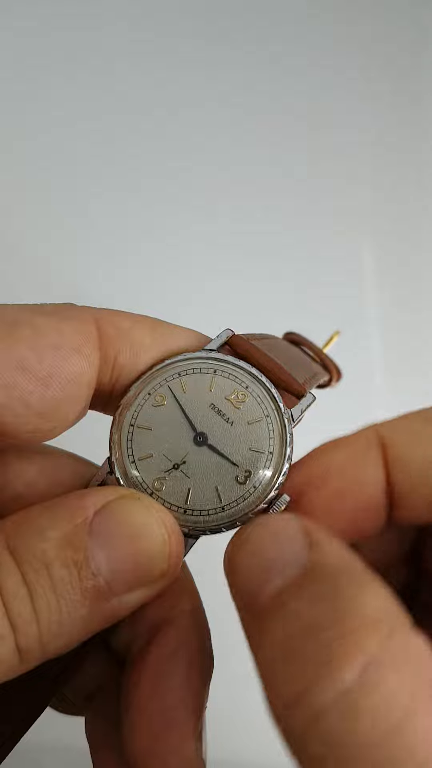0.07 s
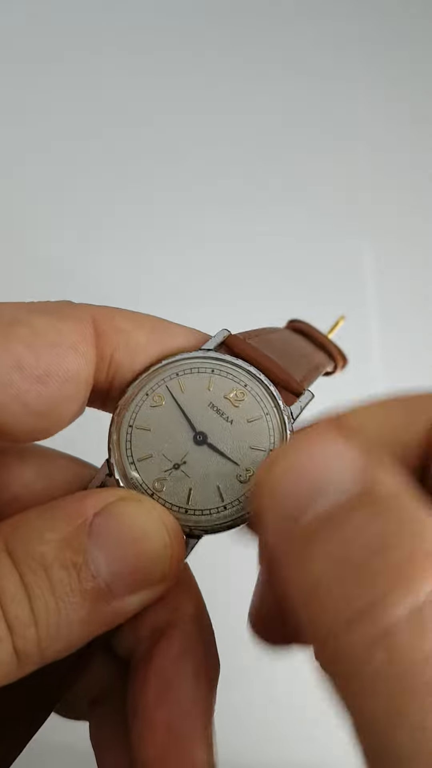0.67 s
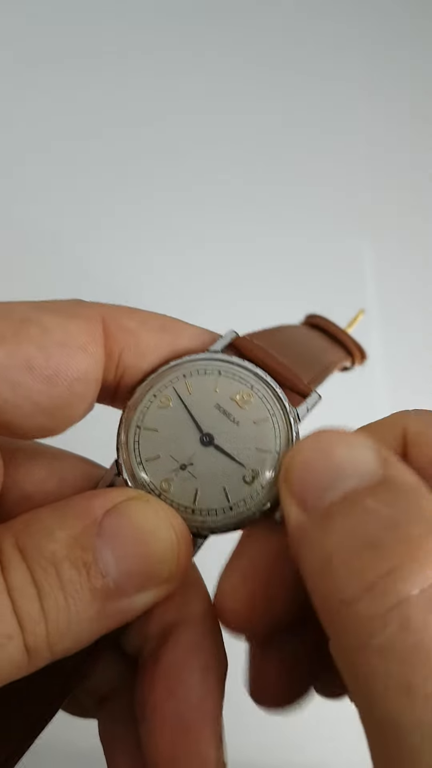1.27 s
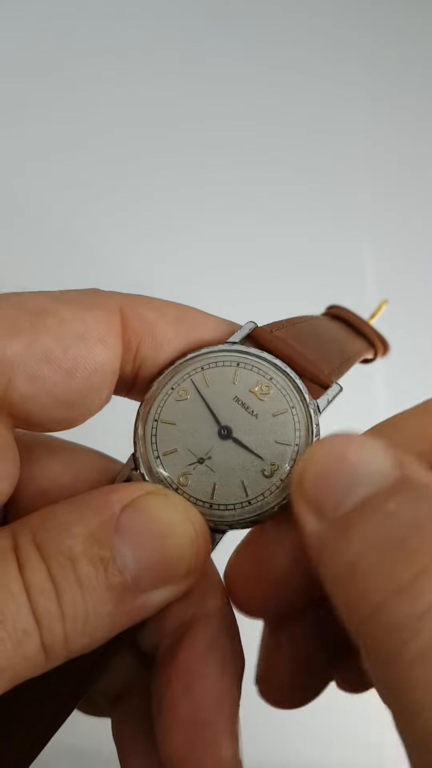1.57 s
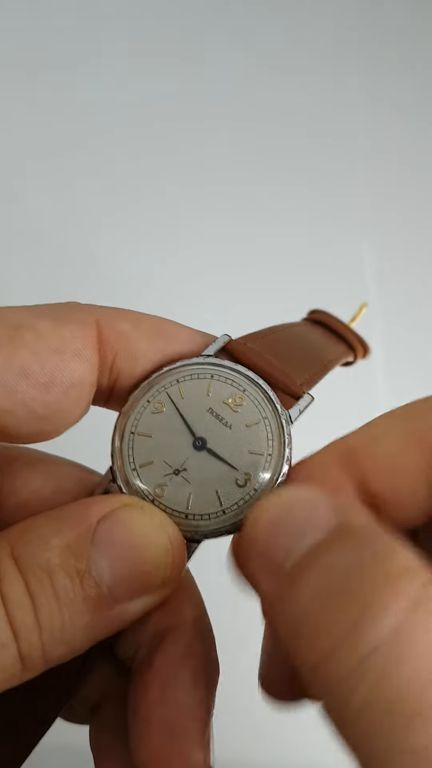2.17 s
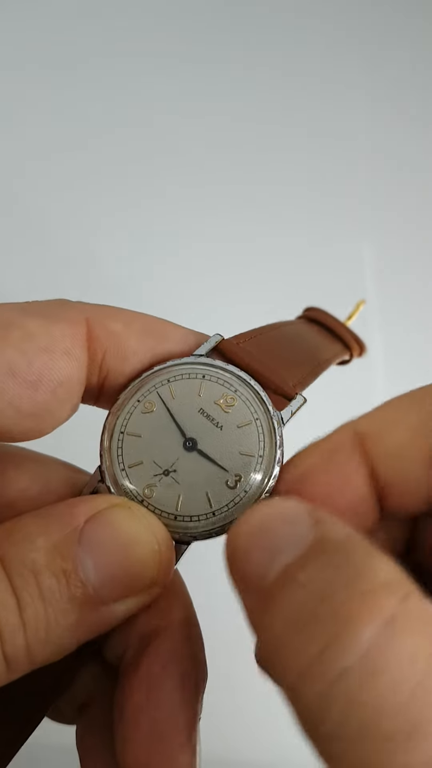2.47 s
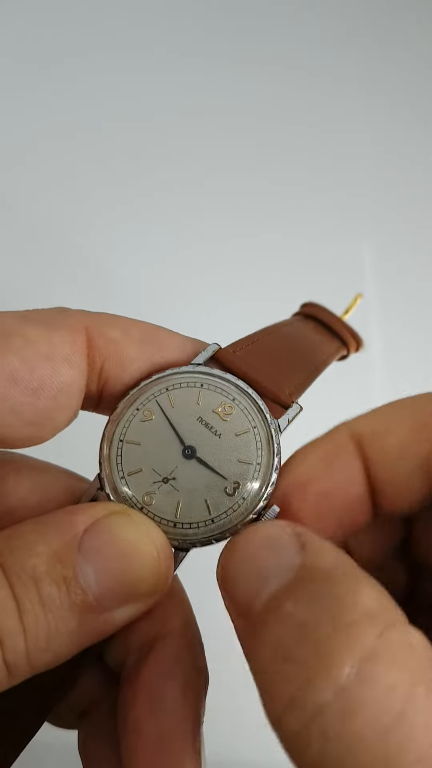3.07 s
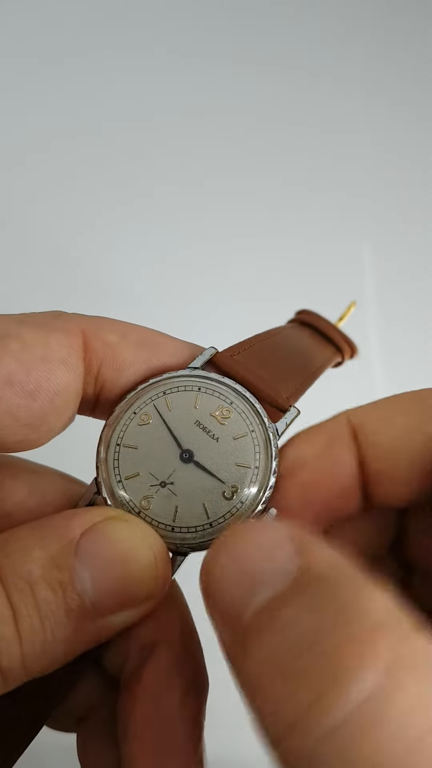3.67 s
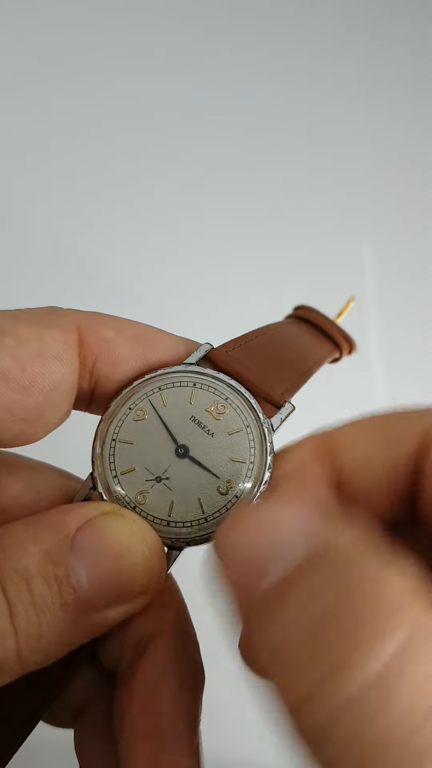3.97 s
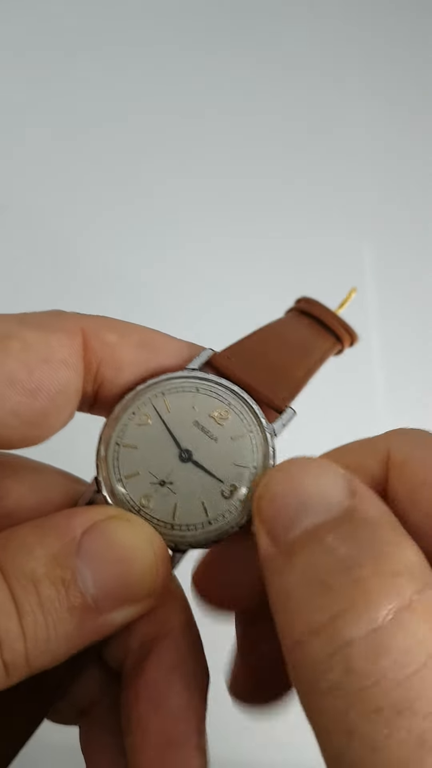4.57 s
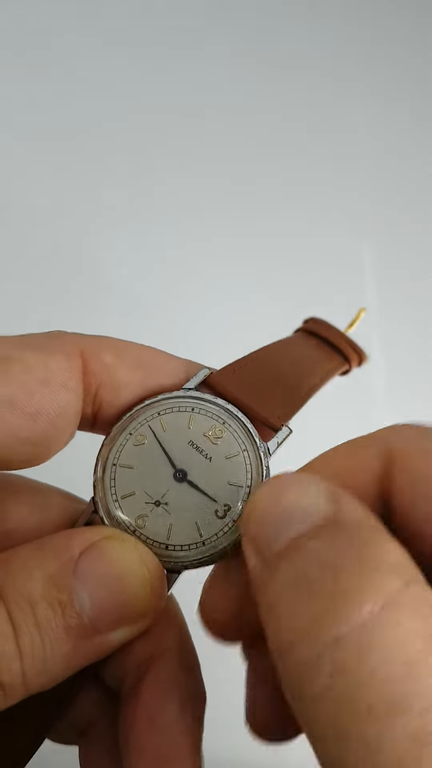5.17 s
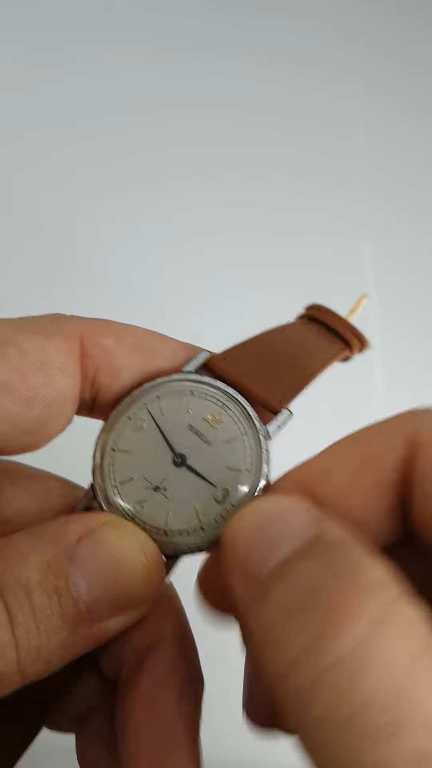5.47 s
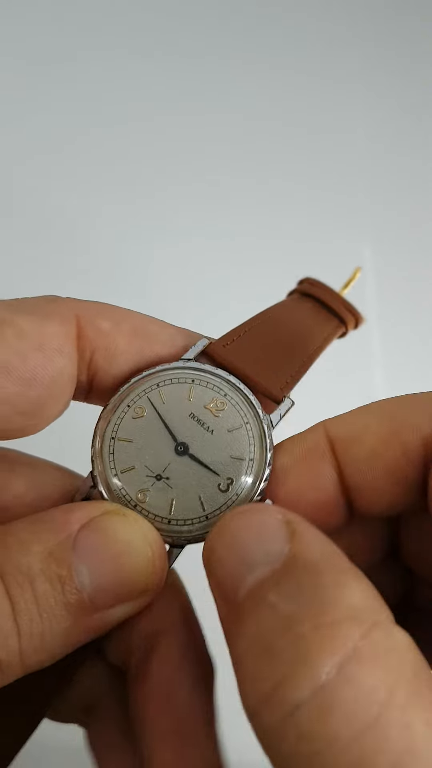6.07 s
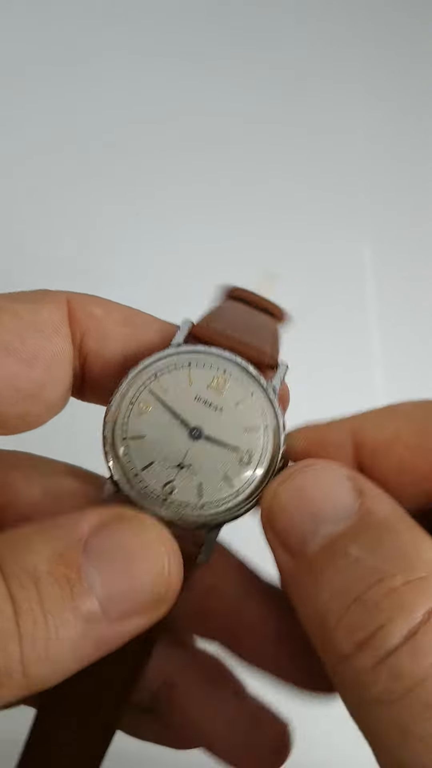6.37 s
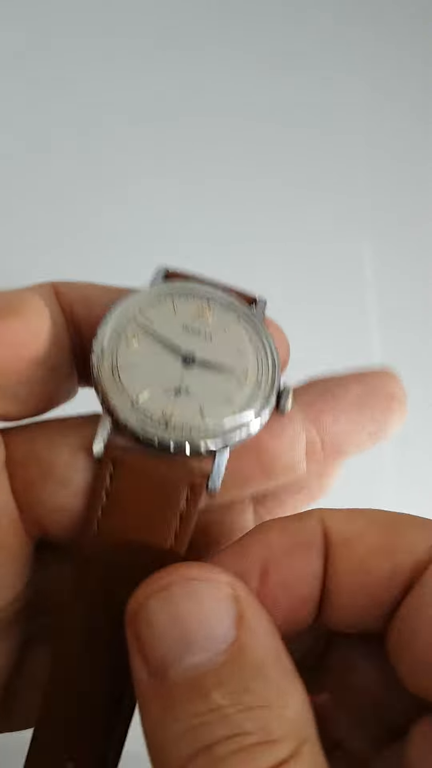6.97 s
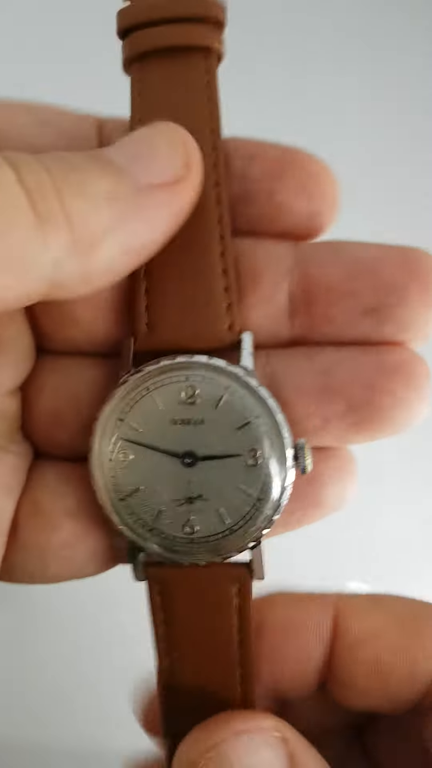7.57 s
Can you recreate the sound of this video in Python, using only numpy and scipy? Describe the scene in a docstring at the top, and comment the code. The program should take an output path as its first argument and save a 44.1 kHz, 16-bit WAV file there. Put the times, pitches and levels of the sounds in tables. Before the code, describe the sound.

Close, evenly paced metallic ratchet clicks of a watch crown being wound in a quiet room, ending with faint leather strap handling.

```python
"""Faint room air and mains hum are heard first, and almost at once a small wristwatch is wound by hand,
close to a stereo microphone. Each turn of the crown drags the pawl over a few ratchet teeth; then the
mainspring snaps the wheel back against it. Both impacts excite the resonant modes of the steel case.
Now and then the grip shifts with a soft thud. At the end the fingers turn the watch over: its strap
ticks and skin brushes the leather."""
import sys
import numpy as np
from scipy import signal
from scipy.fft import rfft, irfft, next_fast_len
from scipy.io import wavfile
from scipy.ndimage import map_coordinates

SR = 44100
rng = np.random.default_rng(int(sys.argv[2]) if len(sys.argv) > 2 else 0)


def waveform_to_disk(signal):
    """Save audio, clipped to [-1, 1], as 16-bit WAV at the path in sys.argv[1]."""
    frames = np.transpose(np.atleast_2d(signal))
    scaled = np.clip(frames, -1, 1) * 32767
    samples = np.round(scaled).astype(np.int16)
    wavfile.write(sys.argv[1], SR, samples)


N = 345303

# Levels in the tables are relative; each source adds its own gain.
# spectrum of the room air: (frequency [Hz], level [dB])
AIR_SPECTRUM = [(15, -25.5), (30, -9.5), (58, -2), (82, -6), (125, -1), (210, -3), (300, -7.5), (620, -8),
                (800, -12.5), (1500, -19), (4000, -26.5), (9500, -35), (16000, -25.5)]
# likeness of the air in the two channels: (frequency [Hz], coherence [0 to 1])
AIR_COHERENCE = [(60, 0.85), (180, 0.8), (350, 0.67), (700, 0.23), (1600, 0.004), (5000, 0.015)]
# partials of the hum: (frequency [Hz], level [dB])
HUM_PARTIALS = [(97, -77), (120, -66.5), (167, -75), (192, -69.5), (641, -78.5), (861, -83), (1147, -85)]
# turns of the crown: (start [s], travel [teeth], speed [teeth/s])
CROWN_TURNS = [(0.186, 8.12, 213), (0.541, 7.62, 153), (0.88, 8.2, 172), (1.21, 9.34, 178),
               (1.556, 4.98, 143), (1.877, 7.58, 178), (2.205, 6.35, 201), (2.53, 8.19, 170),
               (2.855, 7.98, 172), (3.177, 6.31, 195), (3.491, 6.73, 177), (3.823, 7.22, 167),
               (4.154, 6.21, 202), (4.483, 7.16, 187), (4.813, 8.42, 155), (5.146, 7.38, 159),
               (5.492, 4.52, 155), (5.836, 1.34, 182)]
# modes of the case: (frequency [Hz], T60 at damping 1 [s], level [dB])
CASE_MODES = [(2100, .025, -24), (2700, .025, -21), (3250, .035, -17), (3520, .032, -11), (3720, .028, -9),
              (3930, .03, -4), (4300, .03, -14), (5070, .033, -10.5), (5620, .03, -12), (5920, .033, -12),
              (6420, .04, -7), (6620, .036, -7), (7300, .028, -10), (7660, .028, -6), (8150, .028, -8),
              (8750, .026, -9), (9400, .028, -6), (9800, .028, -5), (10050, .028, -7), (10550, .028, -11),
              (11500, .028, -13), (12300, .025, -14), (12820, .036, -10), (13100, .034, -9.5),
              (13800, .025, -12), (14400, .028, -11.5), (15100, .028, -9), (15650, .03, -9.5)]
# spectrum of steel striking or sliding on steel: (frequency [Hz], level [dB])
CRACK_SPECTRUM = [(300, -25), (1400, -21), (2600, -15), (3200, -10), (3900, 0), (4500, -9), (5200, -3),
                  (7000, -2), (10000, 0), (11500, -7), (15500, -4)]
# colour of the tooth ticks: (frequency [Hz], gain [dB])
TOOTH_COLOUR = [(1000, -1.5), (2000, 3), (2800, -8.5), (3800, -1.5), (4600, -15.5), (5600, 2),
                (6500, -10.5), (8200, -6), (9500, -9), (11500, 0.5), (15500, -1)]
# the pawl locks after each turn: (time [s], level [dB])
PAWL_SNAPS = [(0.3206, -17), (0.6376, -20), (0.9894, -18.5), (1.3112, -16.5), (1.6343, -19.5),
              (1.9719, -18), (2.3026, -16.5), (2.6261, -18.5), (2.9671, -16.5), (3.2894, -17.5),
              (3.5746, -25), (3.9272, -16.5), (4.2578, -20), (4.589, -16), (4.9175, -18), (5.2611, -17.5),
              (5.605, -19), (5.9557, -16.5)]
# spectrum of the springs' many faint tones: (frequency [Hz], level [dB])
SPRING_SPECTRUM = [(2600, -19), (3500, -8), (4600, -21), (6100, -3), (6450, 1.5), (6900, -19.5),
                   (8000, -12.5), (9800, -9), (11000, -23), (12500, -13), (13000, -7), (13600, -15)]
# level difference between the microphone's ports: (frequency [Hz], left minus right [dB])
PORT_BALANCE = [(1000, 0.5), (2100, -10.5), (3200, 7), (3800, 2), (4300, 15.5), (5030, 15), (5800, -8),
                (6500, 6), (7400, -9.5), (9300, -5.5), (10000, -6), (10800, 6.5), (13000, -1),
                (15000, 10.5)]
# phase difference between the ports: (frequency [Hz], left lead [rad])
PORT_PHASE = [(300, 0), (2100, 1.1), (3400, 2.1), (3900, 2.3), (5700, 3.5), (6500, 4.3), (7400, 5.2),
              (9400, 7.3), (10500, 7.5), (12900, 7.3), (15000, 8.4)]
# reverberation time of the room: (frequency [Hz], T60 [s])
ROOM_DECAY = [(300, 0.39), (3500, 0.18), (8000, 0.12), (15000, 0.2)]
# shifts of the grip: (time [s], length [s], level [dB], pitch [Hz])
GRIP_SHIFTS = [(3.22, .11, -64.5, 75), (4.92, .05, -58, 210), (4.94, .08, -63.5, 75), (5.6, .12, -62.5, 72)]
# knocks on the case: (time [s], level [dB], low-band gain [dB], hardness [0 leather to 1 steel])
STRAP_TOUCHES = [(6.2384, -46.5, -15, 1), (6.9102, -39, 9.5, 0.38), (6.993, -44, -24, .05),
                 (7.0896, -36, -20, 1), (7.596, -52, -5, .3), (7.6245, -46.5, -10, 0.55),
                 (7.6335, -39, -4, 0.74)]
# spectrum of a leather tick: (frequency [Hz], level [dB])
LEATHER_SPECTRUM = [(200, 5), (1500, 10), (3500, 8.5), (6500, 9.5), (9000, -16), (16000, -14.5)]
# skin slides over the strap: (time [s], length [s], level [dB])
SKIN_RUBS = [(7.385, .05, -64.5)]
# spectrum of that friction: (frequency [Hz], level [dB])
SKIN_SPECTRUM = [(300, -4), (2000, 2), (5500, 5), (9500, -9), (14000, 6)]


def amp(db):
    """Decibels to amplitude ratio."""
    return 10 ** (np.asarray(db) / 20)


def unit(x):
    """Normalisation to rms 1."""
    return x / np.sqrt(np.mean(x ** 2) + 1e-20)


def along(points, hz):
    """Interpolation of a curve on a logarithmic frequency axis."""
    knots, values = np.transpose(points)
    return np.interp(np.log(hz + 1), np.log(knots + 1), values)


def filtered(x, response):
    """Linear filtering: the spectrum is multiplied by a frequency response."""
    n = x.shape[-1]
    padded = next_fast_len(n + 4096)
    return irfft(rfft(x, padded) * response(np.fft.rfftfreq(padded, 1 / SR)), padded)[..., :n]


def coloured(x, points):
    """Zero-phase filtering by a curve of (frequency [Hz], gain [dB])."""
    return filtered(x, lambda hz: amp(along(points, hz)))


def noise(spectrum, size):
    """Two incoherent noises of rms 1 with a given spectrum."""
    return unit(coloured(rng.standard_normal((2, size)), spectrum))


def wobble(rate):
    """Smooth random modulation: a spline through rate knots a second."""
    return map_coordinates(rng.standard_normal(int(N * rate / SR) + 4), [np.arange(N) * rate / SR])


def swells(rows, spectrum):
    """Amplitude modulation of noise by Gaussian envelopes."""
    t = np.arange(N) / SR
    envelope = sum(amp(db) * np.exp(-(2 * (t - s) / length) ** 2) for s, length, db in rows)
    return envelope * noise(spectrum, N)


def add(track, start_s, sound):
    """Superposition of a sound on the track."""
    i = round(start_s * SR)
    track[:, i:i + sound.shape[1]] += sound[:, :N - i]


def room_air(level_db=-62.5):
    """Diffuse-field coherence: long waves reach both ports alike, so the bass is nearly mono."""
    def mid_side_gains(hz):
        angle = np.arccos(np.clip(along(AIR_COHERENCE, hz), -1, 1)) / 2
        return np.array([np.cos(angle), np.sin(angle)])
    mid, side = filtered(noise(AIR_SPECTRUM, N), mid_side_gains)
    return amp(level_db) * unit(np.array([mid + side, mid - side]))


def mains_hum(gain_db=-1, waver_db=2, drift_s=.00039):
    """An appliance hums in partials that waver by slow amplitude and phase modulation."""
    t = np.arange(N) / SR
    hum = np.zeros(N)
    for hz, db in HUM_PARTIALS:
        amplitude = amp(db + gain_db + waver_db * wobble(6.6))
        hum += amplitude * np.sin(2 * np.pi * hz * (t + drift_s * wobble(14)))
    return hum


def steel_contact(damping, scatter_db, crack_db, crack_t60, rattle_db, rattle_t60, push_db=-6.5):
    """Impact excitation: a push and a crack, then damped case modes that loose wheels keep stirring."""
    t = np.arange(SR // 16) / SR
    hz, t60, db = np.transpose(CASE_MODES)
    strength = amp(db + scatter_db * rng.standard_normal(len(hz)))
    pitch = hz * (1 + .005 * rng.standard_normal(len(hz)))  # the grip loads the case anew each time
    phase = 2 * np.pi * np.outer(pitch, t) + 1.05 * rng.standard_normal((len(hz), 1))
    decay = amp(-60 * damping * np.outer(1 / t60, t))
    ring = strength @ (np.cos(phase) * decay)
    # so small a body radiates little bass
    ring = signal.sosfilt(signal.butter(3, 2400, "high", fs=SR, output="sos"), ring)
    chatter = amp(rattle_db - 60 * t / rattle_t60) * rng.standard_normal((2, len(t)))
    rattle = signal.fftconvolve(chatter, ring[None] / np.linalg.norm(ring), axes=1)[:, :len(t)]
    burst = amp(crack_db - 60 * t / crack_t60) * rng.standard_normal(len(t))
    crack = coloured(burst, CRACK_SPECTRUM)
    push_s = .00026
    push = amp(push_db) * (1 - t / push_s) * np.exp(-t / push_s)
    return push + crack + ring + rattle


def ratchet(gain_db=-42, uneven_db=.4, stall_teeth=.8):
    """An impact train: the pawl drops off each tooth, ever later as the finger ends its travel."""
    out = np.zeros((2, N))
    for start, travel, speed in CROWN_TURNS:
        teeth = np.arange(np.ceil(travel))
        # with stall_teeth left to go, the finger lags by about one tooth
        lag = stall_teeth * (1 / (travel - teeth) - 1 / travel)
        for s in start + (teeth + lag) / speed:
            tick = steel_contact(damping=1.4, scatter_db=1.5, crack_db=2.5, crack_t60=.008,
                                 rattle_db=-4, rattle_t60=.024)
            add(out, s, amp(gain_db + uneven_db * rng.standard_normal()) * tick)
    return coloured(out, TOOTH_COLOUR)


def mainspring_snaps(gain_db=-10.5, slide_db=-6, bounce_db=-31, spring_db=-36, spring_t60=.19):
    """Elastic recoil: the wheel slides back, locks on the pawl and rebounds; the springs ring on."""
    firm_db, dulling = -16, .8  # snaps softer than firm_db are duller: more of their ring is low
    out = np.zeros((2, N))
    until_lock = np.arange(SR // 200, 0, -1) / SR
    t = np.arange(SR // 4) / SR
    for s, db in PAWL_SNAPS:
        lock_s = s + .0012
        slide = amp(slide_db - 60 * until_lock / .0072) * noise(CRACK_SPECTRUM, len(until_lock))
        lock = steel_contact(damping=1.45, scatter_db=1, crack_db=7, crack_t60=.006,
                             rattle_db=-7.5, rattle_t60=.027, push_db=-7)
        low_db, high_db = rng.normal(-1, 1.15, 2)
        low_db += dulling * (firm_db - db)
        tilt = [(500, 0), (1000, -2), (2300, -2), (3300, low_db), (4200, low_db),
                (5000, 0), (10000, 0), (12000, high_db)]
        snap = coloured(np.hstack([slide, lock]), tilt)
        add(out, lock_s - until_lock[0], amp(db + gain_db) * snap)
        bounce_s = lock_s + rng.uniform(.008, .036)
        add(out, bounce_s, amp(db + gain_db + bounce_db + 2 * rng.standard_normal()) * lock)
        springs = amp(db + spring_db - 60 * t / spring_t60) * noise(SPRING_SPECTRUM, len(t))
        add(out, lock_s, springs)
    return out


def port_response(hz):
    """Interchannel level and phase differences, split equally between the microphone's two ports."""
    side = np.array([[.5], [-.5]])
    return amp(side * along(PORT_BALANCE, hz)) * np.exp(1j * side * along(PORT_PHASE, hz))


def reverberation(x, wet_db=-23, echo_db=-33, echo_s=.0073):
    """Reflection: one wall echo and a diffuse tail that decays at its own rate in each band."""
    hz, t, bands = signal.stft(rng.standard_normal((2, SR // 3)), SR, nperseg=256)
    decay = amp(-60 * t / along(ROOM_DECAY, hz)[:, None])
    tail = signal.istft(bands * decay, SR, nperseg=256)[1]
    tail *= amp(wet_db) / np.linalg.norm(tail[0])
    response = np.pad(tail, ((0, 0), (SR // 200, 0)))  # the tail starts 5 ms late
    response[:, round(echo_s * SR)] += amp(echo_db)
    return signal.fftconvolve(x, response, axes=1)[:, :N]


def grip_thuds():
    """Heavy damping: soft flesh turns each thud into a dull noise band around its pitch."""
    out = np.zeros(N)
    for s, length, db, hz in GRIP_SHIFTS:
        band = [(hz / 3, -30), (hz, 0), (hz * 2, -25), (hz * 4, -60)]
        out += swells([(s, length, db)], band)[0]
    return out


def strap_ticks(gain_db=-7, rise_s=.00043, t60=.031):
    """Contact stiffness: harder knocks of strap, buckle or finger are brighter and ring the case more."""
    soft_treble_db, soft_ring_db, steel_boost_db = -4.5, -46.5, 25.5
    out = np.zeros((2, N))
    t = np.arange(SR // 10) / SR
    for s, db, body_db, hardness in STRAP_TOUCHES:
        boost_db = steel_boost_db * hardness
        tilt = [(800, body_db), (1800, 0), (7000, 0), (11000, soft_treble_db + boost_db)]
        tick = unit(coloured(noise(LEATHER_SPECTRUM, len(t)), tilt))
        envelope = amp(db + gain_db - 60 * t / t60) * (1 - np.exp(-t / rise_s))
        add(out, s, envelope * tick)
        ring = steel_contact(damping=.8, scatter_db=2, crack_db=3, crack_t60=.003,
                             rattle_db=-6, rattle_t60=.015)
        add(out, s, amp(db + soft_ring_db + boost_db) * ring)
    return out


def skin_rub():
    """Sliding friction: skin on leather gives a brief swell of broadband noise."""
    return swells(SKIN_RUBS, SKIN_SPECTRUM)


def scene():
    """Superposition of the watch's direct sound, its reflections, the thuds and the background."""
    winding = filtered(ratchet() + mainspring_snaps(), port_response)
    direct = winding + strap_ticks() + skin_rub()
    return direct + reverberation(direct) + grip_thuds() + room_air() + mains_hum()


def record(dry, cutoff_hz=15950):
    """Band limiting: a steep low-pass removes the highest treble."""
    return filtered(dry, lambda hz: 1 / np.sqrt(1 + (hz / cutoff_hz) ** 160))


dry = scene()
out = record(dry)
waveform_to_disk(out)
```